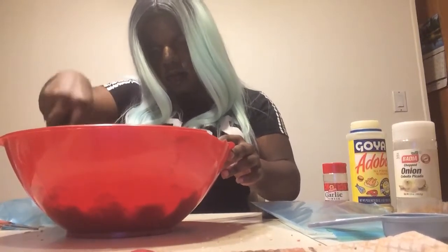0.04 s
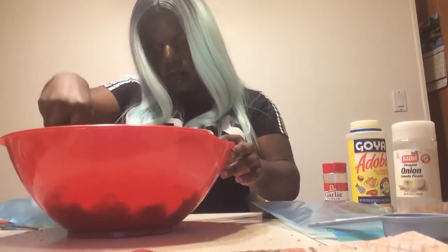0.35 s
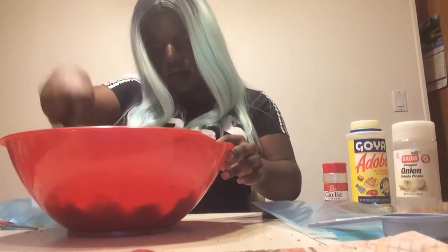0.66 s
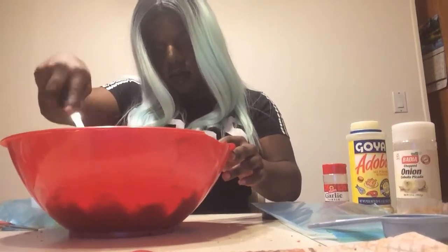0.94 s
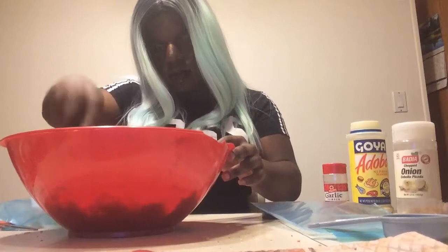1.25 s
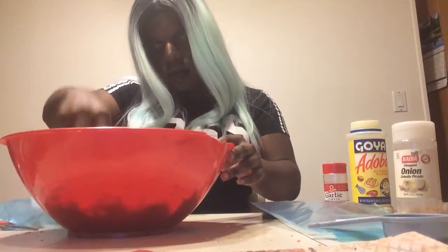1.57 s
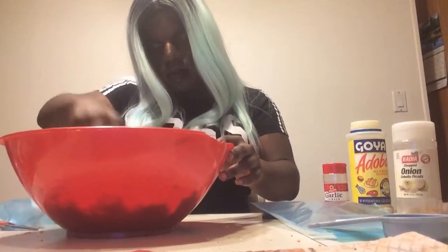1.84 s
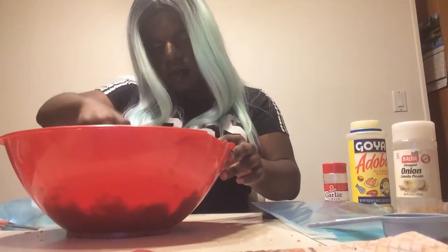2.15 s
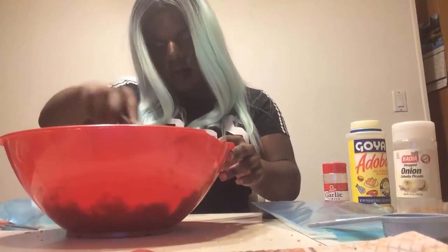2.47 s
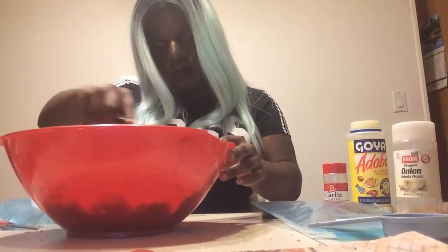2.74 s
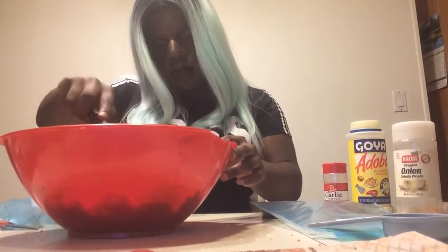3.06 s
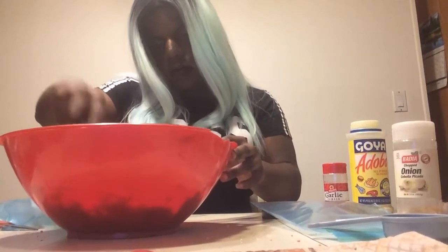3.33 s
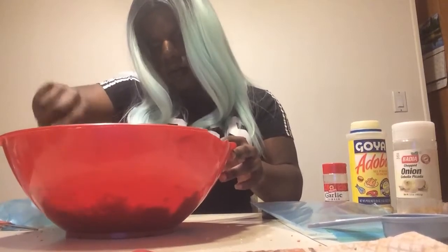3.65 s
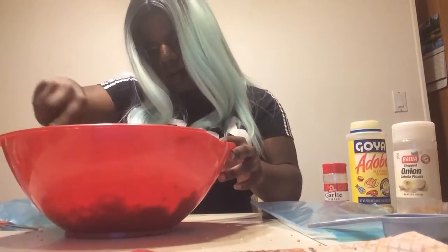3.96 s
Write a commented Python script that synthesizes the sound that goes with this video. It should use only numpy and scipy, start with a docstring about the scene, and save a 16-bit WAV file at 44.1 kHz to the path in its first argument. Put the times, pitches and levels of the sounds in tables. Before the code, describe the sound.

Wet minced meat is stirred in a big plastic bowl, about three strokes a second. A utensil squelches, taps and scrapes while the bowl thumps the table. One hard knock comes near the end, with slight small-kitchen echo.

```python
"""Stirring wet minced meat

A hand stirs the meat in a big plastic bowl on a kitchen table, about three strokes a second.
The utensil stabs in with a squelch, taps the wall, scrapes along it, squishes the meat and thumps
the bowl against the table, while little air pockets pop. Near the end one hard knock rings the
whole bowl. The small kitchen echoes it all."""
import sys
import numpy as np
from scipy import signal
from scipy.fft import rfft, irfft, next_fast_len
from scipy.io import wavfile
from scipy.ndimage import uniform_filter1d, map_coordinates

SR = 44100
rng = np.random.default_rng(int(sys.argv[2]) if len(sys.argv) > 2 else 0)


def wav_out(sig):
    """Save sig, one row per channel (or a flat mono array), as 16-bit PCM at SR to the path in sys.argv[1]."""
    wavfile.write(sys.argv[1], SR, np.round(np.clip(np.atleast_2d(sig).T, -1, 1) * 32767).astype(np.int16))


N = 176400
T = np.arange(SR // 2) / SR  # each single sound gets half a second
HZ = np.fft.rfftfreq(len(T), 1 / SR)  # the frequencies in such a sound


def amp(db):
    """Turn decibels into a gain, a number to multiply by."""
    return 10 ** (np.asarray(db) / 20)


def unit(x):
    """Scale x so its average strength (rms) is 1."""
    return x / np.sqrt(np.mean(x ** 2) + 1e-20)


def peaked(x):
    """Scale x so its peak is 1."""
    return x / np.abs(x).max()


def along(points, hz):
    """Read between (frequency, value) points, on a log frequency scale."""
    freqs, values = np.transpose(points)
    return np.interp(np.log(hz + 1), np.log(freqs + 1), values)


def add(out, s, x):
    """Mix x into out, starting at s seconds."""
    start = round(s * SR)
    x = x[max(-start, 0):max(len(out) - start, 0)]
    out[max(start, 0):][:len(x)] += x


def filtered(x, gain):
    """Turn each frequency of a whole track up or down by gain(hz)."""
    size = next_fast_len(N + SR // 2)
    return irfft(rfft(x, size) * gain(np.fft.rfftfreq(size, 1 / SR)), size)[:N]


def wobble(x):
    """A smooth random curve with a new value at each whole number of x."""
    return map_coordinates(rng.standard_normal(len(T) // 8), [x], mode="mirror")


def blow(*gains):
    """The sharpest pulse with these tones combined and no sound before its start."""
    cepstrum = irfft(np.log(sum(g ** 2 for g in gains) + 1e-12) / 2)
    # folding this onto its first half packs the energy at the start
    cepstrum[1:] *= 2
    cepstrum[len(T) // 2:] = 0
    return irfft(np.exp(rfft(cepstrum)))


def contact(*gains, ripple_db=3, ripple_step_hz=173.4, delay_at_500_hz_s=0.000976):
    """A blow on one spot of the bowl: each spot favours its own notes, and the wall smears the blow."""
    spot = amp(ripple_db * wobble(HZ / ripple_step_hz) * HZ / (HZ + 500))
    pulse = blow(*[g * spot for g in gains])
    lag = 4 * np.pi * delay_at_500_hz_s * np.sqrt(500 * HZ)  # high notes cross the plastic faster
    return peaked(irfft(rfft(pulse) * np.exp(-1j * lag)))


def ring(notes, rough):
    """Fading notes, made unsteady by the loose load of meat."""
    ringing = np.zeros(len(T))
    for hz, db, fade_s in notes:
        waver = rough * wobble(T * np.sqrt(hz) * 4)
        ringing += amp(db - 60 * T / fade_s) * np.sin(2 * np.pi * hz * T + waver)
    return ringing * (1 - np.exp(-T / 0.00035))


def sliding(x, ripple_db=4.5):
    """The favoured notes keep changing as the utensil slides from spot to spot."""
    hz, _, spectra = signal.stft(x, SR, nperseg=512)
    ripple = uniform_filter1d(rng.standard_normal(spectra.shape), size=3, axis=0)
    ripple = unit(uniform_filter1d(ripple, size=3, axis=1))
    gain = amp(ripple_db * ripple * (hz / (hz + 500))[:, None])
    return signal.istft(spectra * gain, SR, nperseg=512)[1][:len(x)]


def rub(gain, rise_s, fall_s, grains_per_s, spread_db, cling_db=2, cling_per_s=190):
    """A cloud of tiny slips that sticks and lets go; it rises 20 dB to its middle, then falls."""
    sizes = rng.standard_normal(len(T))
    sizes *= amp(spread_db * rng.standard_normal(len(T)) + cling_db * wobble(T * cling_per_s))
    grains = sizes * (rng.random(len(T)) < grains_per_s / SR)
    t = T - T.mean()
    swell = amp(-20 * np.where(t < 0, (t / rise_s) ** 2, t / fall_s))
    return unit(sliding(irfft(rfft(grains) * gain))) * swell


# tone of the room's background noise: f/Hz, level/dB
AIR_TONE = [(15, -61), (25, 12), (70, 7.5), (405, 1.5), (516, -1), (1130, -5.5), (1610, -8.5),
            (3720, -17.5), (14800, -25.5), (16000, -76.5)]
def air(level_db=-67.5):
    """The quiet kitchen: a faint, steady, low noise."""
    noise = filtered(rng.standard_normal(N), lambda hz: amp(along(AIR_TONE, hz)))
    return amp(level_db) * unit(noise)


# notes the bowl rings with, for taps and the knock: f/Hz, level/dB, time to fade by 60 dB/s
BOWL_NOTES = [(334, -2, 0.1), (612, 3.5, 0.052), (980, 3, 0.066), (1390, 1, 0.062), (1562, 6.5, 0.043),
              (1883, 9.5, 0.019), (2337, 2, 0.025), (2940, -9, 0.037), (3208, -6, 0.048),
              (4400, -12.5, .03), (4747, -10, 0.044), (5035, -11, 0.049), (7440, -15, 0.02)]
# tone of a tap's sharp crack: f/Hz, level/dB
TAP_CRACK = [(40, -39.5), (150, -12), (500, 5), (1000, 1), (2300, -2), (2900, -10.5), (3700, -46.5),
             (4800, -36), (8500, -52.5), (15500, -41)]
# the utensil taps the wall: t/s, level/dB, f/Hz, width of the note/Hz, crack/dB
TAPS = [(.029, -39.5, 4370, 2480, -3), (0.0707, -32, 1500, 900, 10), (0.3843, -32.5, 1800, 1210, -2),
        (0.7403, -27.5, 1850, 920, -7.5), (0.7967, -31, 1360, 710, -8), (0.947, -48.5, 2700, 2600, -8),
        (1.1361, -26, 1460, 900, -1), (1.3912, -19, 1330, 696, -19), (1.435, -31.5, 1250, 900, -11),
        (2.2046, -31, 1000, 704, -10), (2.2493, -32, 1700, 1610, 0), (2.5816, -11.5, 1080, 760, -6.5),
        (2.8614, -12, 1274, 600, -12.5), (3.2655, -37, 1480, 974, -9), (3.484, -35, 2000, 1500, -14),
        (3.5878, -7, 1280, 1390, 2.5), (3.664, -30, 1320, 580, -19)]
def taps(ring_db=-10.5, low_cut_hz=290):
    """Each tap briefly rings one patch of the wall, and through it the whole bowl."""
    out = np.zeros(N)
    bowl = ring(BOWL_NOTES, rough=1.0)
    radiated = HZ ** 4 / np.hypot(HZ ** 4, low_cut_hz ** 4)  # the wall gives off little bass
    for s, db, hz, width_hz, crack_db in TAPS:
        crack = amp(crack_db + along(TAP_CRACK, HZ))
        hit = contact(radiated * resonance(hz, width_hz), radiated * crack)
        ringing = peaked(signal.fftconvolve(hit, bowl)[:len(T)])
        add(out, s, amp(db) * (hit + amp(ring_db) * ringing))
    return out


def resonance(hz, width_hz):
    """The tone of a short note that takes a few cycles to swell; a wider one dies sooner."""
    return (HZ * width_hz) ** 2 / ((hz ** 2 - HZ ** 2) ** 2 + (HZ * width_hz) ** 2)


# tone of a scrape: f/Hz, level/dB
SCRAPE_TONE = [(100, -21), (300, 4), (550, 1), (900, 1.5), (1130, -3.5), (1550, 9), (2300, -1.5),
               (3150, -5.5), (3800, -8.5), (4600, -7.5), (7000, -14), (8500, -20), (15000, -25.5)]
# the utensil scrapes the wall: t/s (loudest point), rise/s, fall/s, level/dB, treble/dB
SCRAPES = [(0.03, 0.0029, 0.041, -51, -7), (0.074, 0.033, 0.039, -46, 0), (0.211, 0.058, .04, -58, -4),
           (.387, 0.01, 0.066, -41, 1.5), (0.581, 0.11, 0.034, -61, 6.5), (0.743, 0.01, 0.044, -45, -6),
           (.797, 0.071, 0.094, -53.5, 5.5), (1.108, 0.0077, 0.075, -44.5, 4.5),
           (1.378, 0.008, 0.039, -35.5, 8.5), (1.433, .02, 0.021, -46, 9), (1.647, 0.015, 0.027, -43.5, 13),
           (1.695, 0.076, 0.028, -55.5, 9), (1.911, 0.0085, 0.053, -48.5, 16),
           (2.213, 0.019, 0.05, -44, 0.5), (2.581, 0.0073, 0.033, -37.5, -1.5),
           (2.641, 0.014, 0.024, -34.5, 3.5), (2.866, 0.011, 0.023, -41, -16),
           (2.924, 0.067, 0.039, -43, -3.5), (3.3, 0.027, 0.089, -40, -8.5),
           (3.602, 0.026, 0.056, -35.5, 0.5), (3.705, 0.015, 0.027, -44.5, -20),
           (3.864, 0.0028, 0.024, -47.5, 7), (3.903, 0.022, 0.045, -29, -13.5)]
def scrapes(treble_hz=2860):
    """Fine wet crackle as the utensil slides along the plastic."""
    out = np.zeros(N)
    for s, rise_s, fall_s, db, treble_db in SCRAPES:
        tone = amp(along(SCRAPE_TONE, HZ) + treble_db * HZ ** 2 / (HZ ** 2 + treble_hz ** 2))
        add(out, s - T.mean(), amp(db) * rub(tone, rise_s, fall_s, grains_per_s=9000, spread_db=2.5))
    return out


def crackle(count=4, hz=1820, spread_octaves=0.45, swell_s=0.00021):
    """Tiny air pockets open at random as each scrape dies away; gives rows for pops()."""
    rows = []
    for s, _, fall_s, db, _ in SCRAPES:
        for late, detune in zip(rng.random(count), rng.standard_normal(count)):
            pitch = hz * 2 ** (spread_octaves * detune)
            rows.append((s + fall_s * late, db - 3 - 12 * late, pitch, swell_s))
    return rows


# notes of the table and the loaded bowl: f/Hz, level/dB, time to fade by 60 dB/s
TABLE_NOTES = [(79, -34.5, 0.42), (133, -34, 0.5), (240.5, -23.5, 0.31), (328.3, -21.5, 0.28),
               (379, -17, 0.15), (445.2, -23, 0.17), (546.4, -16, 0.18)]
# tone of a thump's low push: f/Hz, level/dB
THUMP_BASS = [(25, -24.5), (50, -14.5), (78, 8), (110, 3), (170, 0), (260, 1.5), (400, -7.5), (900, -36),
              (4000, -40)]
# tone of a thump's click, and of a pop's wet spit: f/Hz, level/dB
DULL_CLICK = [(100, -26), (600, -20.5), (1000, -18.5), (1600, -14), (1950, -22.5), (2400, -30.5),
              (3500, -59), (8000, -52), (15000, -72)]
# the bowl thumps the table: t/s, level/dB, f/Hz, bass/dB, click/dB
THUMPS = [(.041, -27, 483, -1.5, 3.5), (0.45, -38, 490, -37, -18), (0.767, -47, 570, -28, 12),
          (0.825, -36.5, 520, -14, -11), (1.133, -27, 607, -14, -7.5), (1.392, -22.5, 584, -17, -5),
          (1.3969, -18, 576, -5, -4), (1.433, -28, 504, -12, -2), (1.6582, -23, 536, -8, -32),
          (1.7019, -31.5, 401, -19, 0.5), (1.935, -32.5, 530, -15, -17), (1.9607, -27, 435, -8, -32),
          (1.998, -33, 540, -23, -2), (2.243, -20, 480, -9.5, -19), (2.583, -26, 540, -36, 9),
          (2.678, -14, 536, -5.5, 0.5), (2.863, -26, 399, -31, -6.5), (2.9524, -12.5, 525, -5, 0),
          (2.9665, -26, 376, -4, -3), (3.268, -16.5, 554, -7.5, 9.5), (3.2891, -16.5, 362, 3.5, 1),
          (3.4359, -31.5, 538, -3, -5), (3.588, -17, 610, -23, -11.5), (3.667, -29, 450, -8.5, 8),
          (3.915, -18, 440, -12, -6), (3.9198, -14.5, 715, -8, -5.5), (3.928, -17, 380, -10, -23)]
def thumps(width_hz=180, top_cut_hz=2700):
    """A hollow note from the loaded bowl, a low push and a dull click; the table rings on."""
    out = np.zeros(N)
    rings = [ring(TABLE_NOTES, rough=1.0) for _ in range(4)]
    for s, db, hz, bass_db, click_db in THUMPS:
        push = amp(bass_db + along(THUMP_BASS, HZ))
        click = amp(click_db + along(DULL_CLICK, HZ))
        hit = contact(resonance(hz, width_hz), push, click)
        ringing = amp(bass_db / 2) * rings[rng.integers(len(rings))]
        add(out, s, amp(db) * (hit + ringing))
    # keeps the thumps dull, with no bright click
    return filtered(out, lambda hz: 1 / np.hypot(1, (hz / top_cut_hz) ** 4))


# tone of a squish: f/Hz, level/dB
SQUISH_TONE = [(30, -20), (60, 11.5), (80, 9), (110, 4), (250, -2), (420, -1), (490, 3), (570, 6.5),
               (680, -6.5), (800, -10.5), (1100, -13.5), (1600, -12), (2500, -27), (5000, -65),
               (15000, -55)]
# squished meat drags the bowl: t/s (loudest point), rise/s, fall/s, level/dB, bass/dB
SQUISHES = [(0.089, 0.032, 0.015, -43.5, -14), (.22, 0.028, 0.12, -54, -10), (0.441, 0.047, 0.1, -45, -7.5),
            (.58, 0.068, 0.077, -45.5, -15), (.77, 0.033, 0.15, -44, -9), (1.145, 0.0068, 0.047, -43, -8),
            (1.224, 0.036, 0.039, -44.5, 4.5), (1.415, 0.044, 0.054, -33, -25),
            (1.505, 0.01, 0.024, -47, -15), (1.68, 0.028, 0.053, -36.5, -5), (1.914, 0.014, 0.015, -45, 32),
            (1.98, 0.068, 0.08, -43, -5.5), (2.28, 0.087, 0.12, -52, -2.5),
            (2.622, 0.049, 0.069, -42.5, -2), (2.705, 0.025, 0.05, -42.5, 7),
            (2.899, 0.053, 0.055, -42.5, -3.5), (2.972, 0.053, 0.016, -38.5, 5),
            (3.332, 0.01, 0.017, -30.5, -17.5), (3.451, 0.04, 0.052, -47, 3),
            (3.615, 0.0084, 0.043, -43, -16), (3.703, 0.0063, 0.056, -53, 24),
            (3.866, 0.0022, 0.015, -35.5, 12), (3.935, 0.032, 0.053, -28.5, -9)]
def squishes(bass_hz=199):
    """Coarse, dull bursts in the meat, shaped by the hollow of the bowl."""
    out = np.zeros(N)
    for s, rise_s, fall_s, db, bass_db in SQUISHES:
        tone = amp(along(SQUISH_TONE, HZ) + bass_db * bass_hz ** 2 / (HZ ** 2 + bass_hz ** 2))
        add(out, s - T.mean(), amp(db) * rub(tone, rise_s, fall_s, grains_per_s=980, spread_db=3))
    return out


# air pockets pop in the wet meat: t/s, level/dB, f/Hz, swell/s
POPS = [(.158, -39.5, 810, 0.00081), (0.2134, -33.5, 1710, 0.00031), (0.307, -40, 830, 0.00036),
        (.3855, -34.5, 2290, 0.00054), (.496, -45, 1580, 0.001), (0.7666, -27.5, 1720, 0.00067),
        (0.9479, -33.5, 870, 0.00082), (.9505, -42, 650, 0.00097), (1.138, -42.5, 3300, .0015),
        (1.2971, -40, 873, .0012), (2.209, -39, 3305, .0016), (2.789, -48.5, 900, .0007),
        (3.462, -43, 943, 0.00055), (3.6239, -22.5, 1650, 0.00078), (3.813, -45.5, 1663, 0.00041),
        (3.899, -27, 1500, 0.0011)]
def pops(sag=0.011, spit_db=-20.5):
    """Each air pocket spits and sings for a few cycles as it opens, sagging in pitch."""
    out = np.zeros(N)
    for s, db, hz, swell_s in POPS + crackle() + stabs():
        age = T / swell_s
        pitch = hz * (1 + sag * (1 - np.minimum(age / 2, 3)))
        note = np.sin(2 * np.pi * np.cumsum(pitch) / SR)
        spit = unit(irfft(rfft(rng.standard_normal(len(T))) * amp(along(DULL_CLICK, HZ))))
        swell = peaked(age ** 2 * np.exp(-age))
        add(out, s, amp(db) * swell * (note + amp(spit_db) * spit))
    return out


# the utensil stabs into the meat: t/s, length/s, level/dB
STABS = [(.372, .022, -44), (.738, .016, -44), (1.092, .035, -53), (1.369, .018, -36.5), (2.2, .016, -45)]
def stabs(count=9, from_hz=4560, to_hz=1700, swell_cycles=0.8):
    """A squelch is a run of tiny pops, falling in pitch as the hole opens; gives rows for pops()."""
    rows = []
    for s, length_s, db in STABS:
        depth = (np.arange(count) + rng.random(count)) / count
        hz = from_hz * (to_hz / from_hz) ** depth * np.exp(rng.normal(0, 0.19, count))
        rows += zip(s + length_s * depth, db + rng.normal(0, 0.9, count), hz, swell_cycles / hz)
    return rows


# tone of the hard knock's crack: f/Hz, level/dB
KNOCK_CRACK = [(100, -17.5), (600, 2), (2000, 13.5), (3700, -12), (5000, 1.5), (9000, -22.5), (15500, -15)]
def knock(s=3.2972, db=-5.5, crack_db=12, spray_db=-38.5, spray_fall_s=0.015, spray_hz=4600):
    """The utensil hits the bare wall hard, ringing the whole bowl and flinging off a wet spray."""
    out = np.zeros(N)
    crack = amp(along(KNOCK_CRACK, HZ))
    strike = amp(crack_db) * contact(crack) + 2 * ring(BOWL_NOTES, rough=0.88)
    add(out, s, amp(db) * peaked(strike))
    add(out, s + 0.002, amp(db - 10) * contact(crack))  # it bounces and hits again
    drops = rng.standard_normal(len(T)) * (rng.random(len(T)) < 9000 / SR)  # 9000 a second
    spray = unit(irfft(rfft(drops) * HZ ** 3 / (HZ ** 4 + spray_hz ** 4)))
    add(out, s, amp(spray_db - 20 * T / spray_fall_s) * spray)
    return out


# first echoes off the near walls: delay/s, level/dB
WALL_ECHOES = [(.0044, -19), (0.0122, -25), (0.018, -33.5)]
# how long the echo lingers: f/Hz, time to fade by 60 dB/s
TAIL_FADE = [(60, 0.22), (200, 0.34), (500, 0.29), (1500, 0.25), (4000, 0.28), (8000, 0.32), (15000, 0.18)]
# tone of the lingering echo: f/Hz, level/dB
TAIL_TONE = [(60, 0.5), (300, 1), (600, -6), (1000, -2.5), (2000, -4.5), (5000, -5.5), (15000, 0.5)]
def kitchen(x, tail_db, pieces=14, build_s=0.0009):
    """The sound itself, a few wall echoes and a blurred tail that changes as the hand moves."""
    out = x.copy()
    for delay_s, db in WALL_ECHOES:
        add(out, delay_s, amp(db) * x)
    for part in np.array_split(np.arange(N), pieces):
        hz, t, noise = signal.stft(rng.standard_normal(len(T)), SR, nperseg=256)
        fade = amp(-60 * t / along(TAIL_FADE, hz)[:, None])
        tail = signal.istft(noise * fade, SR, nperseg=256)[1][:len(T)]
        tail = irfft(rfft(tail) * amp(along(TAIL_TONE, HZ))) * (1 - np.exp(-T / build_s))
        add(out, part[0] / SR, amp(tail_db) * signal.fftconvolve(x[part], tail / np.linalg.norm(tail)))
    return out


def scene():
    """Hits, rubbing and pops in the kitchen, over its quiet air."""
    background = air()
    hits = kitchen(taps() + thumps() + knock(), tail_db=-10.5)
    rubbing = kitchen(scrapes() + squishes(), tail_db=-6)
    popping = kitchen(pops(), tail_db=-17)
    return (hits + rubbing + popping + background)[None]


def record(dry):
    """The microphone loses the deepest bass and the very highest treble."""
    low_hz, top_hz = 26, 16200
    return filtered(dry[0], lambda hz: (hz < top_hz) * hz ** 2 / np.hypot(hz ** 2, low_hz ** 2))[None]


dry = scene()
out = record(dry)
wav_out(out)
```